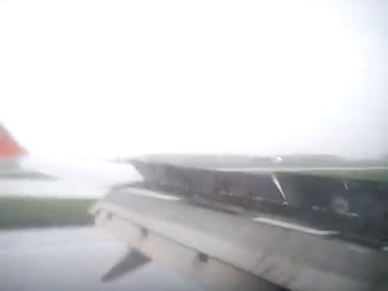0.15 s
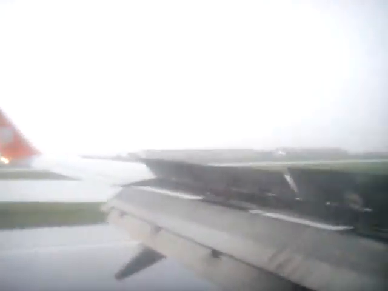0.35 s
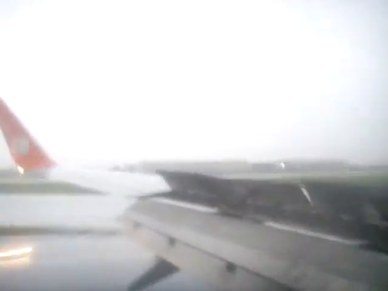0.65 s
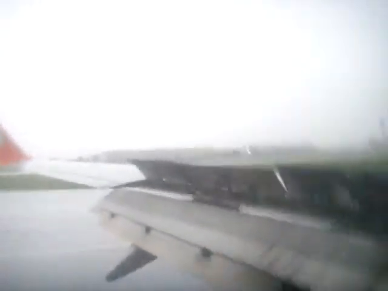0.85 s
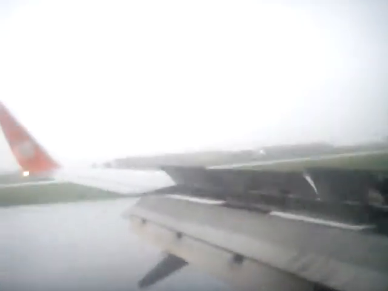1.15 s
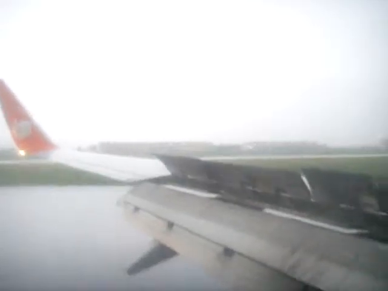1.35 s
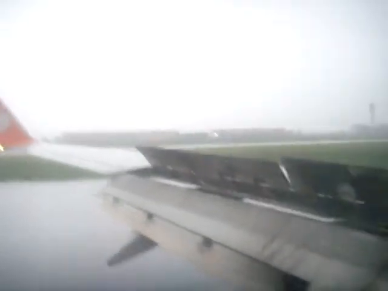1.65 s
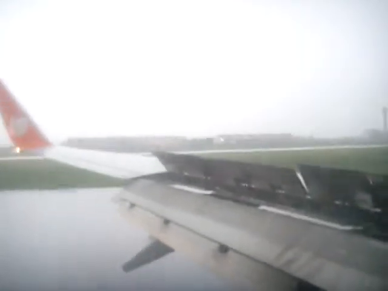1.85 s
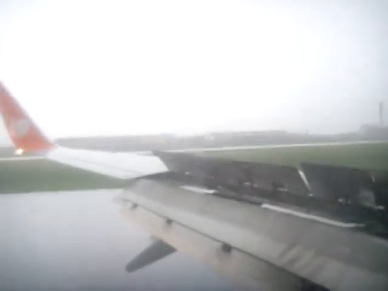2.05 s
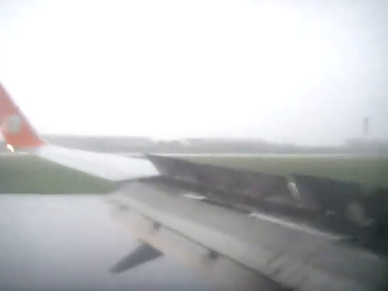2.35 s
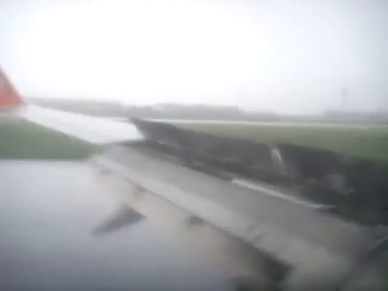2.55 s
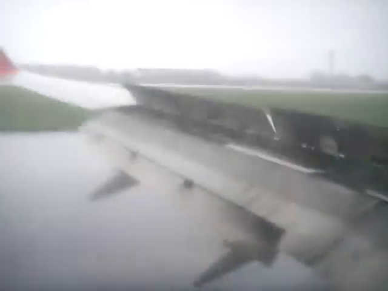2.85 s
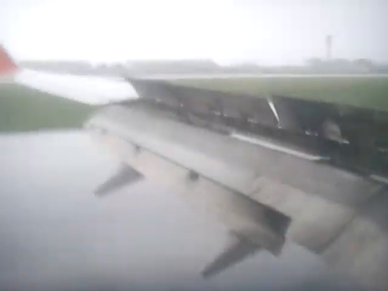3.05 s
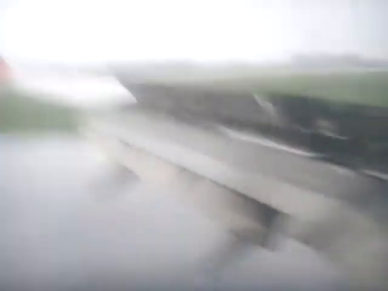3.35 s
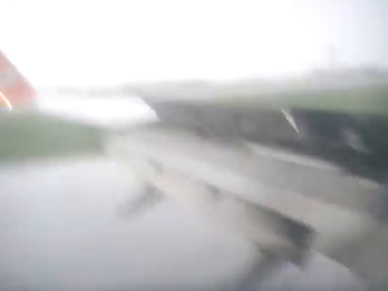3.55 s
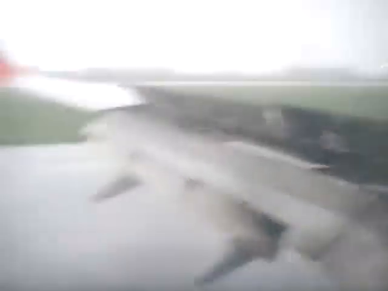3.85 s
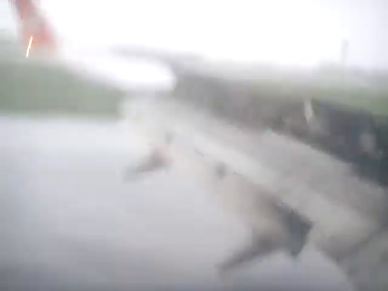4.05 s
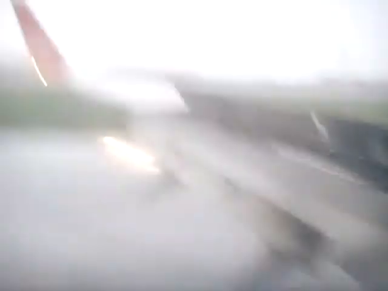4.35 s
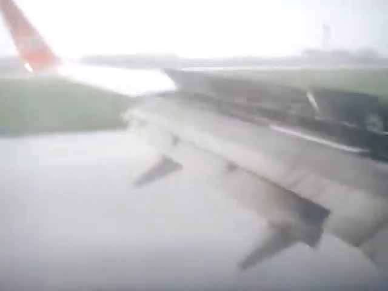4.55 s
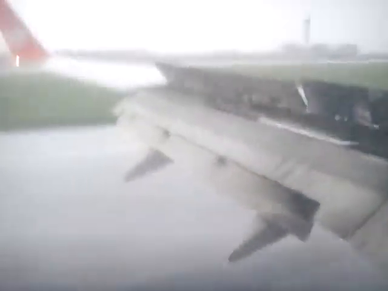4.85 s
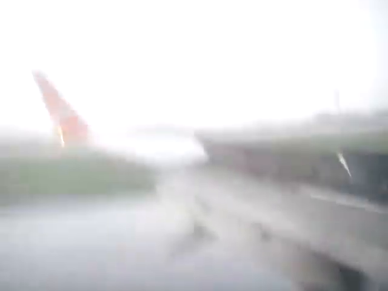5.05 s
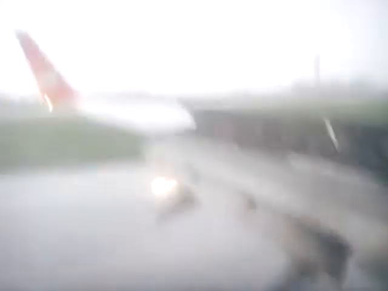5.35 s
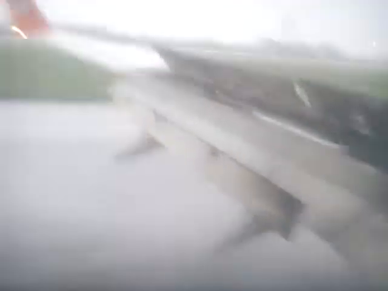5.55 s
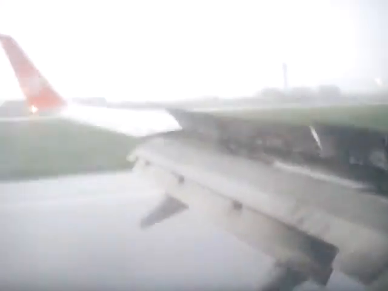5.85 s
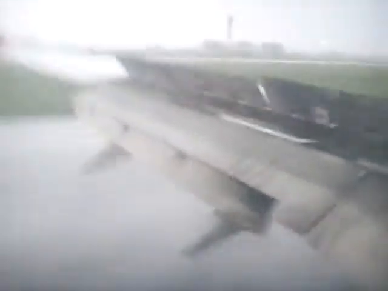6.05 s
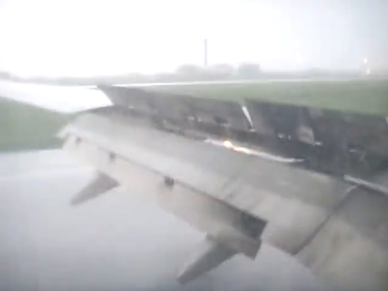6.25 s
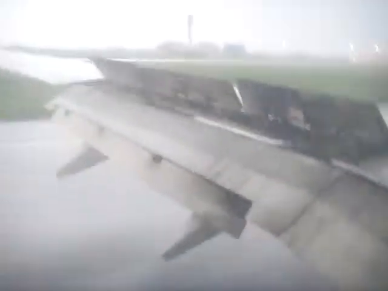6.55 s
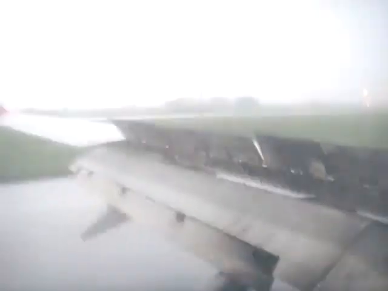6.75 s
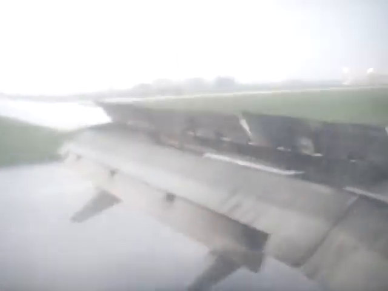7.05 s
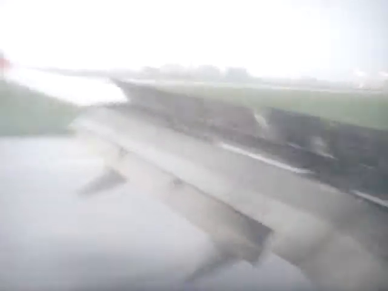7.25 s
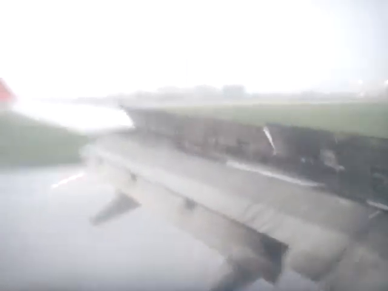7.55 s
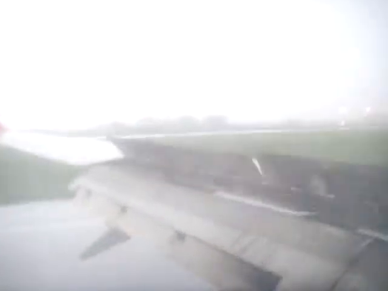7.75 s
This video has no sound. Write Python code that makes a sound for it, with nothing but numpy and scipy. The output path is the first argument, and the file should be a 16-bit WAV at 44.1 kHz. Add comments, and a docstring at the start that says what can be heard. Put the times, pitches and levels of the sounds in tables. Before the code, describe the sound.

From the start, an airliner's wheels rumble deeply on a wet runway, heard inside the cabin over a low engine drone. Dull thumps from runway joints come in quick, uneven succession between about 0.4 and 2.5 seconds, with two more near 3.9 and 5.7. Cabin trim rattles in short bursts until about 3.5 seconds, and panels hum faintly during the first two. From about 1.2 to 3 seconds, reverse thrust builds to a loud, deep roar, joined by a rush of exhaust and a hiss of air and spray. The roar holds until the end, near 8 seconds, with slight, brief surges in the rush. From around 3 seconds, the small microphone overloads: the peaks distort and the treble cuts out for instants. The whole sound is bass-heavy, without any very high frequencies.

```python
"""Inside an airliner rolling out on a wet runway, at a window over the wing.
At first the wheels rumble and thump through the airframe, the trim rattles and cabin panels resonate.
From about one to three seconds reverse thrust builds to a roar, with a rush of exhaust and a hiss
of air and spray. From then on the small camera overloads: the peaks of the roar are clipped flat,
and the treble cuts out for instants."""
import sys
import numpy as np
from scipy.fft import rfft, irfft, next_fast_len
from scipy.io import wavfile
from scipy.ndimage import uniform_filter1d, map_coordinates

SR = 44100
rng = np.random.default_rng(int(sys.argv[2]) if len(sys.argv) > 2 else 0)


def unload_wav(signal):
    """Save mono or channel-first audio to the path in sys.argv[1] as 16-bit WAV at rate SR, clipped to [-1, 1]."""
    wavfile.write(
        sys.argv[1],
        SR,
        np.round(np.clip(np.atleast_2d(signal).T, -1, 1) * 32767).astype(np.int16),
    )


N = 348831


# The engines spool up, then hold. Each row: time in seconds, reverse thrust from 0 to 1.
THRUST = [(0, 0.04), (1.2, 0.11), (1.45, 0.33), (2, 0.42), (2.6, 0.89), (3.1, 1), (7.9, 1.0)]
def reverse_thrust():
    """Thrust governs jet noise: the share of full reverse thrust at each sample."""
    return curves(THRUST)[0]


# Each row: frequency in Hz, relative spectral density in dB.
ROAR_SPECTRUM = [(35, -30.5), (70, -5.5), (105, -1.5), (145, -3), (205, 0.68), (268, -4.5), (325, -2),
                 (378, -10), (412, -8.5), (500, -19), (800, -39), (2500, -91)]
def engine_roar(thrust, idle_db=-18.5, rise_db=10.5):
    """Transmission loss: the cabin wall passes mainly the lows of the jet noise."""
    return amp(idle_db + rise_db * thrust) * even(noise(ROAR_SPECTRUM), seconds=0.15)


# Each row: centre time in seconds, rise over the steady rush in dB.
SURGES = [(2.67, 1.5), (3.25, 1.5), (4.16, 2), (5.2, 3), (5.92, 2), (7.9, 3.5)]
def exhaust_surges(length_s=0.086):
    """Amplitude modulation: the gain in dB as the exhaust flares up briefly."""
    return sum(db * swell(s, length_s) for s, db in SURGES)


# Each row: frequency in Hz, relative spectral density in dB.
RUSH_SPECTRUM = [(250, -24), (510, -6), (605, 1), (680, -0.5), (870, -2), (1200, -8), (1700, -13),
                 (2500, -19.5), (4000, -23), (6300, -40.5)]
def exhaust_rush(thrust, flutter_db, idle_db=-31, rise_db=7.5):
    """Turbulent mixing: the exhaust makes a midrange rush that tears unevenly."""
    growth = np.abs(thrust) ** 1.5  # the power law brings it in after the roar
    return amp(idle_db + rise_db * growth + flutter_db) * noise(RUSH_SPECTRUM)


# Each row: frequency in Hz, relative spectral density in dB.
HISS_SPECTRUM = [(700, -24.5), (1800, -7), (2900, -1.5), (3700, -5), (4300, -3), (4900, 1), (5600, -1),
                 (6300, -5)]
# Each row: time in seconds, base level of the hiss in dB.
HISS_LEVELS = [(0, -39), (1, -36.5), (1.25, -33), (1.95, -35), (2.2, -31), (2.95, -31.5), (3.3, -28.5),
               (4.5, -29.5), (6, -28.2), (7.9, -28)]
def air_and_spray(thrust, flutter_db):
    """Flow noise: air and spray hiss along the fuselage; reverse flow adds a broad whistle."""
    base_db, = curves(HISS_LEVELS)
    whistle = amp(-7) * thrust * resonance(hz=4655, width_hz=1100)
    return amp(base_db + flutter_db) * (noise(HISS_SPECTRUM) + whistle)


# Each row: frequency in Hz, relative spectral density in dB.
RUMBLE_SPECTRUM = [(4, -15), (15, -1.5), (34, -4), (53, 3.5), (74, -6), (105, -6.5), (170, -19),
                   (400, -52.5), (900, -100)]
def wheel_rumble(thrust, idle_db=-15.5, rise_db=2.17, uneven_db=0.96):
    """Structure-borne sound: tyres drum on the uneven runway and shake the airframe."""
    level_db = idle_db + rise_db * thrust + uneven_db * wobble(7)
    return amp(level_db) * even(noise(RUMBLE_SPECTRUM), seconds=0.15)


# Each row: mode frequency in Hz, relative level in dB, time to decay by 60 dB in seconds.
AIRFRAME_MODES = [(37, -2.5, 0.25), (53.3, -0.5, 0.13), (97.5, -15, 0.096), (173, -11.5, 0.079)]
# The wheels hit runway joints. Each row: start in seconds, gain of the blow in dB.
JOINT_HITS = [(.428, -8), (0.886, -6), (1.186, -4.5), (1.246, -6), (1.559, -4), (1.976, -12), (2.521, -6),
              (3.921, -5), (5.692, -9)]
def wheel_thumps():
    """Impulse response: each runway joint rings the airframe's damped low modes."""
    t = np.arange(SR // 2) / SR
    ring = sum(amp(db - 60 * t / t60) * np.sin(2 * np.pi * hz * t) for hz, db, t60 in AIRFRAME_MODES)
    thumps = np.zeros(N + SR)
    for start, db in JOINT_HITS:
        thumps[round(start * SR):][:len(t)] += amp(db) * ring
    return thumps[:N]


# Each row: frequency in Hz, relative spectral density in dB.
TRIM_SPECTRUM = [(200, -19), (700, 0.5), (1800, -4), (3000, -12), (6300, -11)]
# Each row: start in seconds, level in dB, time to decay by 60 dB in seconds.
RATTLES = [(.074, -28, 0.29), (.14, -27, 0.3), (.194, -29, 0.23), (.419, -30, 0.29), (.485, -30, 0.26),
           (.585, -28.5, 0.49), (.691, -29, 0.5), (1.384, -28, 0.31), (1.491, -25, 0.18), (1.538, -24, 0.1),
           (2.163, -24.5, .2), (2.664, -23, .15), (3.49, -21, .15)]
def trim_rattle(chatter_db=4):
    """Damped vibration: panels and bins chatter after a jolt and die away exponentially."""
    t = np.arange(SR // 2) / SR
    envelope = np.zeros(N + SR)
    for start, db, t60 in RATTLES:
        envelope[round(start * SR):][:len(t)] += amp(db - 60 * t / t60)
    chatter = unit(noise(TRIM_SPECTRUM) * amp(chatter_db * wobble(300)))
    return envelope[:N] * chatter


# Each row: centre time in seconds, length in seconds, frequency in Hz, level in dB.
PANEL_HUMS = [(0.16, 0.23, 876, -37), (0.644, .45, 860, -33.5), (1.5, 0.2, 630, -28.5),
              (1.95, .4, 606, -33)]
def panel_hum(width_hz=70):
    """Forced resonance: shaken cabin panels hum at their natural frequencies."""
    return sum(amp(db) * swell(s, length) * resonance(hz, width_hz) for s, length, hz, db in PANEL_HUMS)


def amp(db):
    """The decibel scale: 20 dB is a tenfold amplitude."""
    return 10 ** (np.asarray(db) / 20)


def unit(x):
    """Normalisation: x at rms 1."""
    return x / np.sqrt(np.mean(x ** 2) + 1e-20)


def even(x, seconds):
    """Gain control: dividing by the running rms evens out slow swells."""
    return x / np.sqrt(np.abs(uniform_filter1d(x ** 2, int(seconds * SR))) + 1e-9)


def curves(rows):
    """Linear interpolation: one value per sample for each column after the time."""
    times, *columns = np.transpose(rows)
    return [np.interp(np.arange(N) / SR, times, column) for column in columns]


def wobble(rate):
    """Random modulation: a smooth curve through rate knots a second."""
    knots = rng.standard_normal(int(N * rate / SR) + 4)
    return map_coordinates(knots, [np.arange(N) * rate / SR])


def swell(s, length, order=2):
    """Windowing: a bump from 0 to 1 and back, centred on s; a higher order flattens its top."""
    bump = np.zeros(N)
    near = np.arange(max(0, int((s - 2 * length) * SR)), min(N, int((s + 2 * length) * SR)))
    bump[near] = np.exp(-np.abs(2 * (near / SR - s) / length) ** order)
    return bump


def filtered(x, response):
    """Linear filtering: the spectrum of x times a frequency response."""
    size = next_fast_len(N + SR // 2)
    return irfft(rfft(x, size) * response(np.fft.rfftfreq(size, 1 / SR)), size)[:N]


def low_pass(x, hz, order):
    """Band limiting: above hz the response falls by 6 dB an octave per order."""
    return filtered(x, lambda f: 1 / np.sqrt(1 + (f / hz) ** (2 * order)))


def noise(spectrum):
    """Spectral shaping: white noise coloured by the given spectrum, at rms 1."""
    hz, db = np.transpose(spectrum)
    white = rng.standard_normal(N)
    return unit(filtered(white, lambda f: amp(np.interp(np.log(f + 1), np.log(hz), db))))


def resonance(hz, width_hz):
    """Resonance: noise through two like resonators in series, at rms 1."""
    white = rng.standard_normal(N)
    return unit(filtered(white, lambda f: (f * width_hz / (hz ** 2 - f ** 2 + 1j * f * width_hz)) ** 2))


def scene():
    """Superposition: engines, wheels and cabin fittings add at the seat."""
    thrust = reverse_thrust()
    wheels = wheel_rumble(thrust) + wheel_thumps()
    roar = engine_roar(thrust)
    # rush and hiss share the same surges and tearing, so they flutter together
    surge_db = exhaust_surges()
    tearing_db = -0.03 * wobble(10) + 0.62 * wobble(28) + 1.2 * wobble(130)
    rush = exhaust_rush(thrust, surge_db + tearing_db)
    hiss = air_and_spray(thrust, 0.5 * surge_db + (1.23 + 0.24 * thrust) * tearing_db)
    return (roar + rush + hiss + wheels + trim_rattle() + panel_hum())[None]


# Each row: centre time in seconds, length in seconds, treble gain at the bottom of the dip in dB.
TREBLE_DIPS = [(2.863, 0.01, -17), (2.876, .008, -12), (3.431, 0.01, -19), (4.564, 0.011, -13),
               (4.592, .01, -16), (4.826, 0.016, -10), (5.011, 0.02, -17), (5.127, 0.022, -9),
               (5.3, .012, -16), (5.465, 0.01, -16), (5.855, 0.012, -14), (5.886, 0.011, -16),
               (6.273, .012, -24.5), (6.4, 0.018, -24), (6.788, 0.0096, -15), (7.237, 0.024, -11),
               (7.345, 0.024, -7.5)]
def cut_outs(x, split_hz=430, bass_share=0.094, flickers_per_s=3, flicker_db=-8, mean_flicker_s=0.0079):
    """Two-band attenuation: all but the bass drops away for milliseconds while the engines roar."""
    thrust = reverse_thrust()
    dip_db = sum(db * swell(s, length, order=4) for s, length, db in TREBLE_DIPS)
    for place, size in rng.random((int(flickers_per_s * N / SR), 2)):
        if thrust[int(place * N)] > 0.93:  # near full thrust, shallow dips also come by chance
            flicker = swell(place * N / SR, mean_flicker_s * (0.5 + size), order=4)
            dip_db = np.minimum(dip_db, flicker_db * flicker)
    bass = low_pass(x, split_hz, order=4)
    return bass * amp(bass_share * dip_db) + (x - bass) * amp(dip_db)


def record(dry, band_hz=6260, top_hz=15800, ceiling=0.705, knee=60):
    """Clipping distortion: the narrow-band camera overloads and flattens the peaks of the roar."""
    narrow = low_pass(dry[0], band_hz, order=40)
    clipped = np.clip(cut_outs(narrow), -ceiling, ceiling)
    overshooting = amp(0.23) * low_pass(clipped, band_hz, order=90)
    # the output stage shaves the filter's overshoots, which splatter faintly above the band
    shaved = overshooting / (1 + np.abs(overshooting / ceiling) ** knee) ** (1 / knee)
    return low_pass(shaved, top_hz, order=60)[None]


dry = scene()
out = record(dry)
unload_wav(out)
```